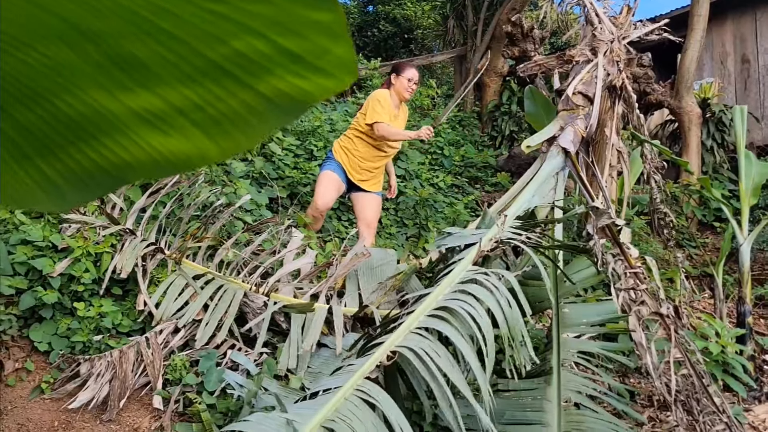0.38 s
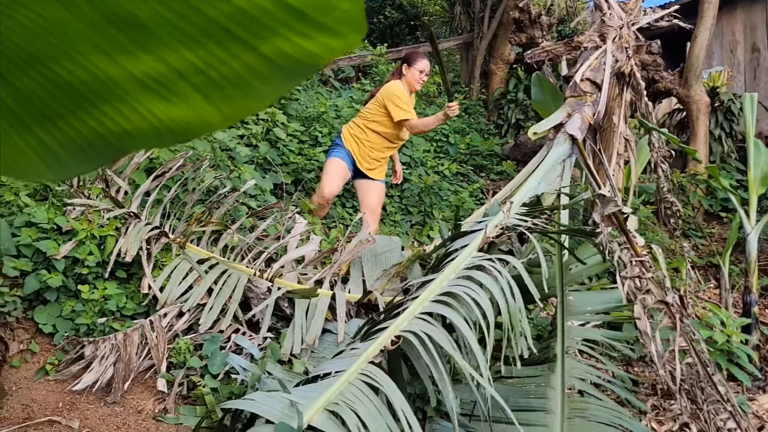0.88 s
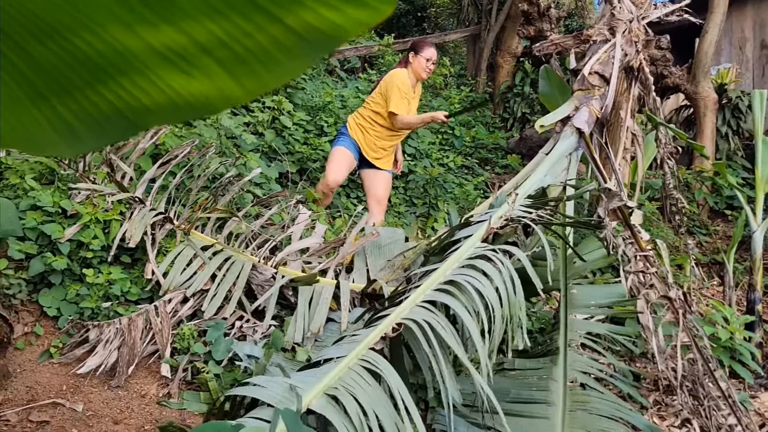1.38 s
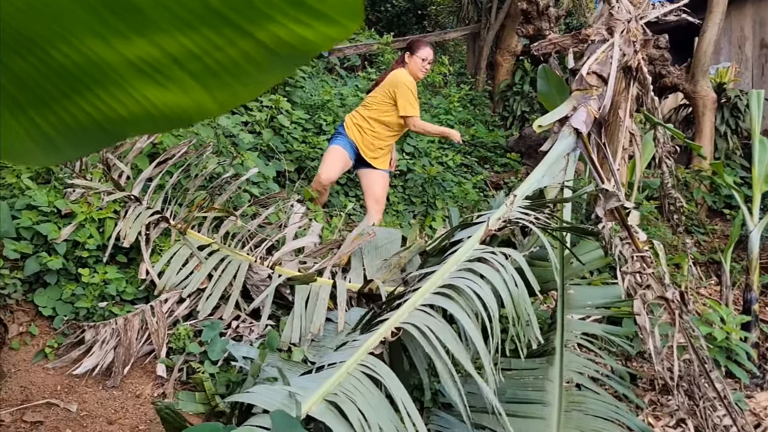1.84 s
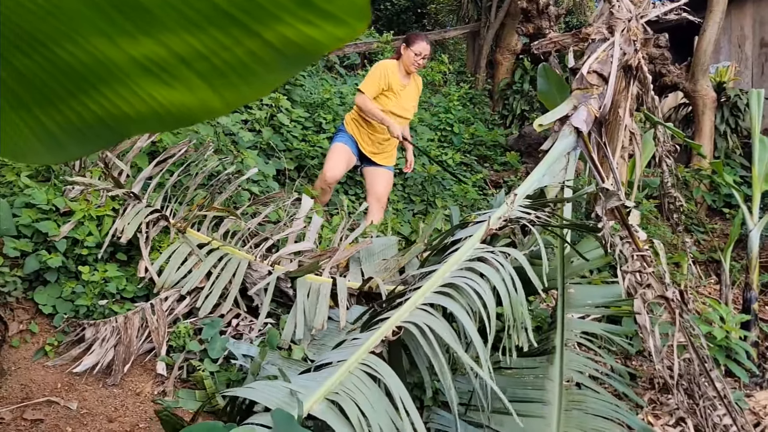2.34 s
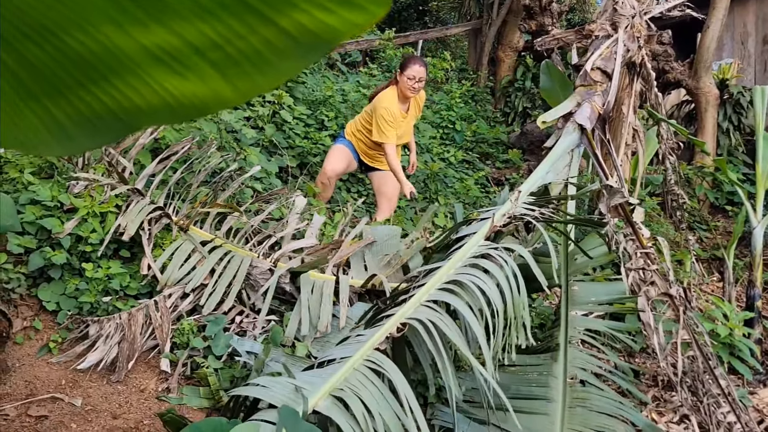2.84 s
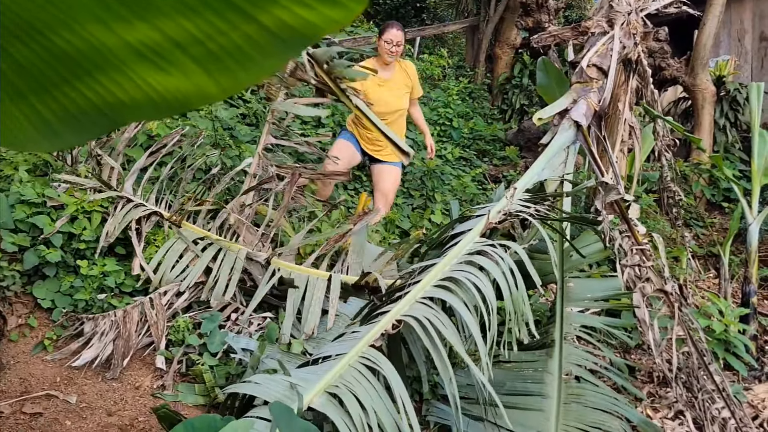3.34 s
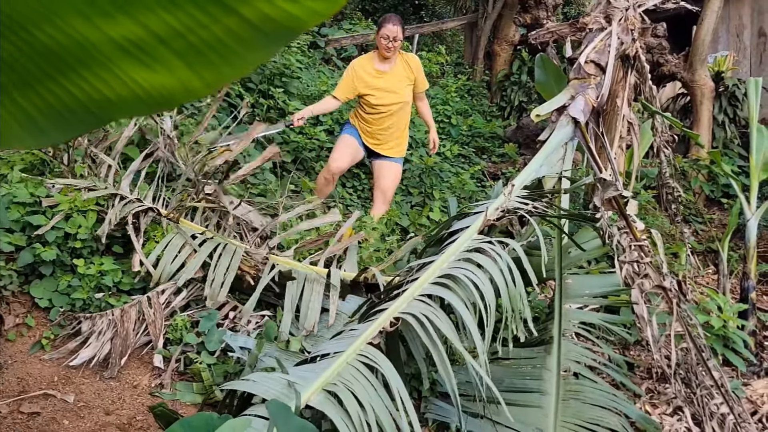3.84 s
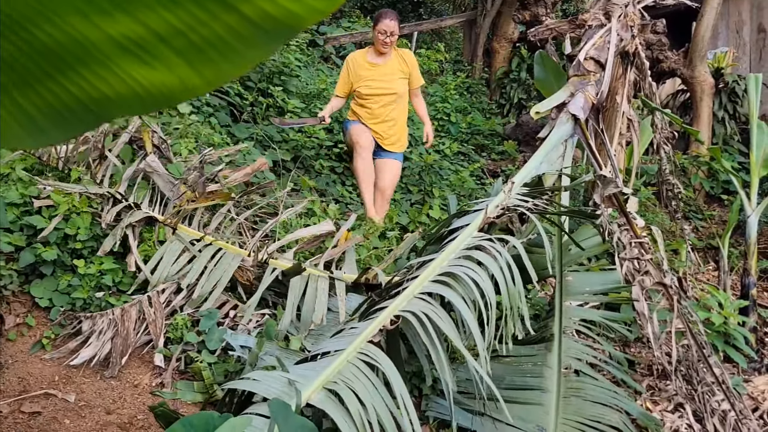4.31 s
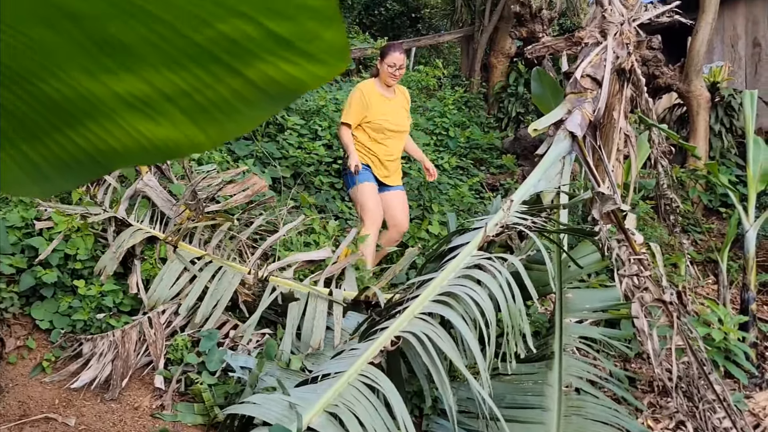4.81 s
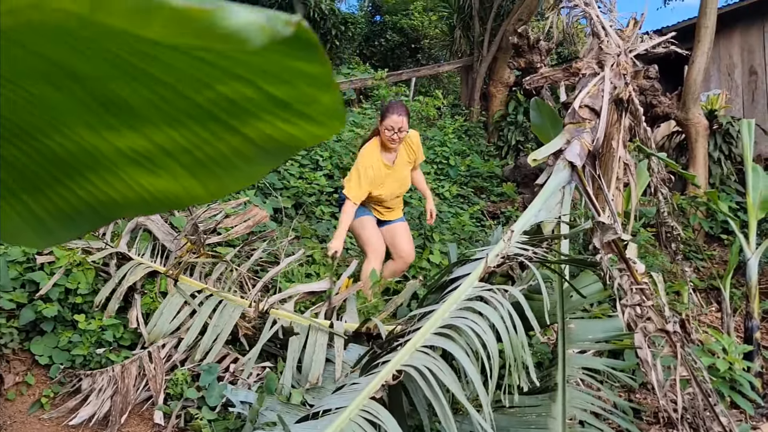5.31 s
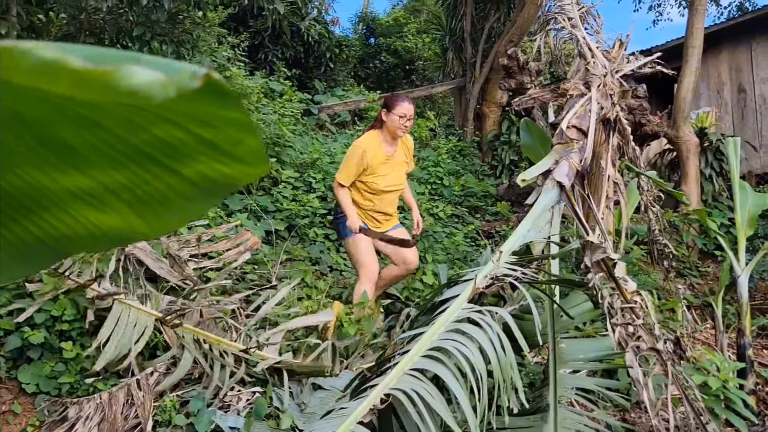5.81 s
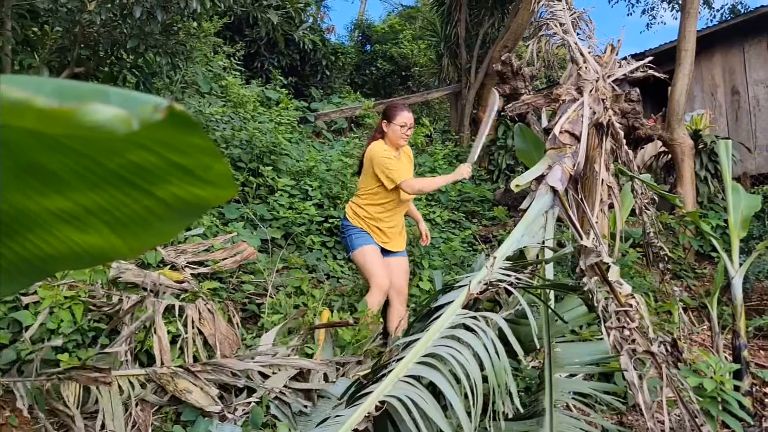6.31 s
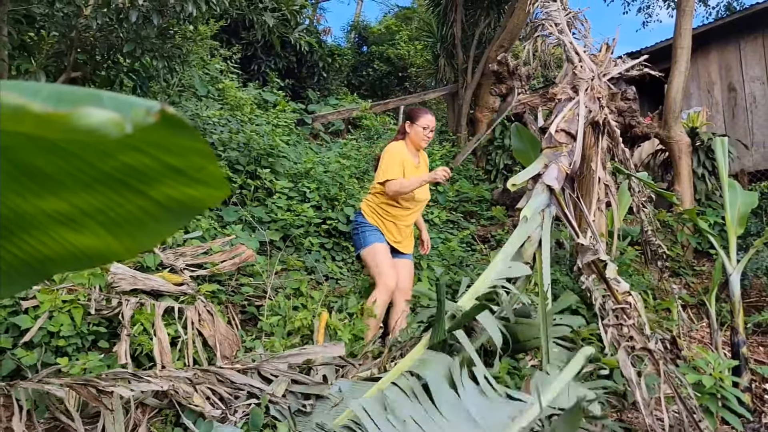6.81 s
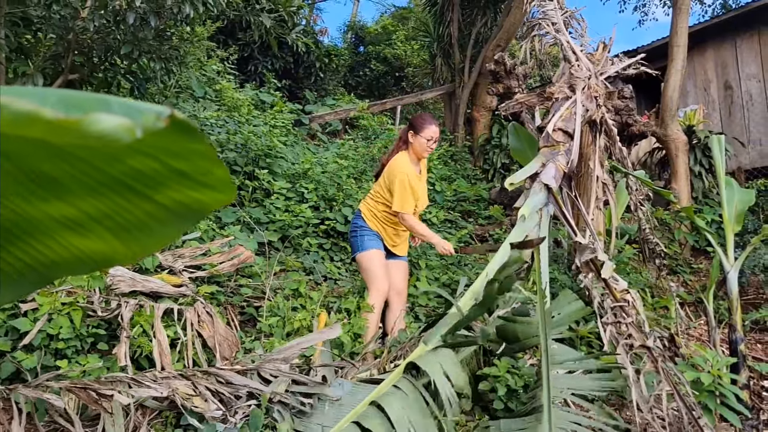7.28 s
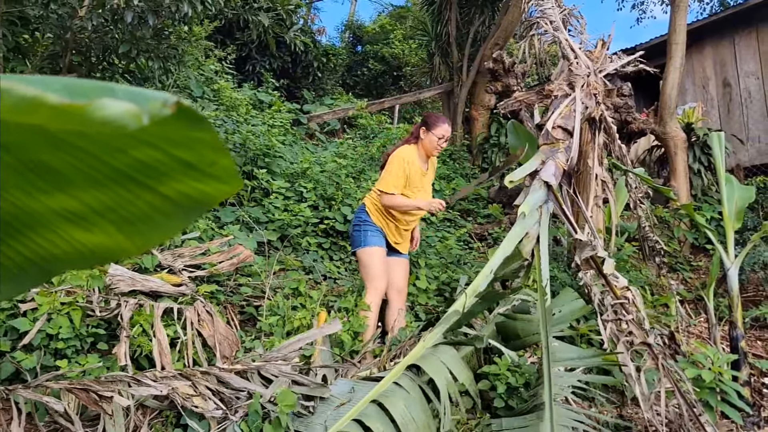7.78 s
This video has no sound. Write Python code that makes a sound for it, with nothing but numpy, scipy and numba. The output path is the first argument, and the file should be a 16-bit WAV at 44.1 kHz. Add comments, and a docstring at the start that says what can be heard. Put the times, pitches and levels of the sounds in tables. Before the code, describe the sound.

A quiet open garden with a low breeze hum, thin steady high insect singing and short dry reflections. At once, about 0.03 s, a blade slices a juicy stalk with a slightly ringing, drawn-out crunch; leaves shudder and crackle until 1.2 s. Thuddier chops land at 1.1 and 1.8 s, with small ticks and rustle. Near 2.5 to 3 s it is quieter, with faint bird whistles sliding down. From 2.9 s big dry leaves swell into a drag and crunch, with bright snaps at 3.3 to 3.5 s, then fading rustles and isolated twig clicks to 5.3 s. At 5.43 s comes the loudest blow, a hard, sharp crack with a short rustling tail. Crisper cuts follow at 6.5 and 7.3 s, with a strong leaf swish and crunches around 6.6 to 7 s, ending on small snaps and settling leaves.

```python
"""Quiet garden: a long blade chops a juicy plant stalk while big dry leaves are dragged and trodden.
Each cut is a burst of snapping fibres that rings the stalk and the steel; rustle is a swarm of tiny crackles,
each from its own direction; ribs and twigs snap with a short ring and splinters. Insects sing in two bands,
birds whistle a few falling notes, filtered noise makes the breeze and hum underneath."""
import sys
import numpy as np
from scipy import signal
from scipy.fft import rfft, irfft
from scipy.io import wavfile
from scipy.ndimage import uniform_filter1d
from numba import njit

SR = 44100
rng = np.random.default_rng(int(sys.argv[2]) if len(sys.argv) > 2 else 0)


def persist_wave(psi):
    """Save psi, clipped to +-1, as 16-bit WAV."""
    counts = np.round(np.clip(psi, -1, 1) * 32767).astype(np.int16)
    wavfile.write(sys.argv[1], SR, np.atleast_2d(counts).T)


def gain_from_db(level_db):
    """Convert decibel levels to linear amplitude factors (20 dB per decade)."""
    decades = np.asarray(level_db, float) / 20
    return 10 ** decades


N = 348522


def colour(table, hz):
    """dB of a (Hz, dB) table, straight on a log frequency axis."""
    table_hz, table_db = np.transpose(table)
    return np.interp(np.log(hz), np.log(table_hz), table_db)


def walk(rate_hz):
    """Random levels held 1 / rate_hz and slewed twice; spread near 1."""
    hold = int(SR / rate_hz)
    steps = np.repeat(rng.standard_normal(N // hold + 1), hold)
    return 0.77 * uniform_filter1d(uniform_filter1d(steps, hold), hold)[:N]


@njit
def ring(start, hz, tau, rise, size):
    """Damped sines, one per grain, begun at fractional samples with a soft edge, cut after six time constants."""
    out = np.zeros(N)
    for k in range(len(start)):
        s = 2j * np.pi * hz[k] / SR - 1 / (tau[k] * SR)
        first = int(np.ceil(start[k]))
        z = size[k] * np.exp(s * (first - start[k]))
        turn = np.exp(s)
        held = np.exp((start[k] - first) / (rise[k] * SR))
        release = np.exp(-1 / (rise[k] * SR))
        for i in range(max(first, 0), min(first + int(6 * tau[k] * SR) + 2, N)):
            out[i] += z.imag * (1 - held)
            z *= turn
            held *= release
    return out


# side the action is on: time_s, left_lag_us (positive: the left port hears it later)
ACTION_SIDE = [(0, 88), (2.4, 90), (2.8, -61), (4, -120), (5.4, -42), (6.1, -150), (6.45, 76), (7.9, 95.5)]


def ports(start_s, hz, tau_s, rise_s, size, scatter_us):
    """The same grains at two microphone ports; each grain's direction sets its lag."""
    lag_s = (np.interp(start_s, *np.transpose(ACTION_SIDE)) + scatter_us) / 1e6
    return np.array([ring((start_s + side * lag_s / 2) * SR, hz, tau_s, rise_s, size) for side in (1, -1)])


# pitch limits of the grains: lowest_hz, highest_hz
GRAIN_RANGE = (50, 16000)


def grain_hz(share):
    """Pitch of a grain; small high ones are far more numerous."""
    lowest_hz, highest_hz = GRAIN_RANGE
    return lowest_hz * (highest_hz / lowest_hz) ** np.sqrt(share)


# centres of the three level regions: thud_hz, body_hz, edge_hz
REGION_CENTRES = (160, 1400, 10500)


def crackles(start_s, levels_db, shape, chance, per_second, cycles, uneven_db, spread_us):
    """Grain sizes give each region its power per octave, with a few much larger than the rest."""
    pitch_chance, size_chance, sign_chance, side_chance, _ = chance
    hz = grain_hz(pitch_chance)
    octaves = np.log2(GRAIN_RANGE[1] / GRAIN_RANGE[0])
    per_octave = per_second * 2 * np.sqrt(pitch_chance) / octaves
    place = np.interp(np.log(hz), np.log(REGION_CENTRES), np.arange(3))
    level_db = sum(np.maximum(1 - abs(place - k), 0) * levels_db[k] for k in range(3))
    level_db = level_db + colour(shape, hz)
    tau_s = cycles / hz + 0.000088  # even the smallest flake rattles a moment
    luck = gain_from_db(-uneven_db * np.log(0.02 + size_chance)) * np.sign(sign_chance - 0.5)
    luck = luck / np.sqrt(np.mean(luck ** 2))
    # crowded or long-ringing grains are made smaller
    size = gain_from_db(level_db) * luck * np.sqrt(12 / (per_octave * tau_s))
    return ports(start_s, hz, tau_s, tau_s, size, spread_us * (2 * side_chance - 1))


# blows: start_s, body_db, thud_db (over body), sink_ms, cut_ms, stalk_hz (pitch favoured by the spot struck),
# blade_db (over body, before a common trim), blade_hz (pitch favoured)
BLOWS = [(0.03, -31, 1.5, 1.02, 20.4, 780, -4, 2000), (1.133, -22.5, 6, 1.06, 2, 970, -30, 11600),
         (1.831, -26, 10, 0.79, 6.4, 460, -22, 7300), (5.433, -18.5, -18, 4.74, 5.8, 200, -18, 3500),
         (6.505, -23, -19, 4, 2.8, 1150, -19, 4250), (7.311, -30, -13, 1.325, 8.9, 1340, -15, 2660)]
# relative spectrum of parting fibres: pitch_hz, level_db (per octave)
FIBRE_COLOUR = [(50, -44), (160, -31.5), (400, -3), (1400, -2.5), (3000, 4.5), (5000, 4.5), (8000, 7),
                (11000, 3.5), (16000, 11)]
# stalk modes: pitch_hz, level_db, t60_s
STALK_MODES = [(158, -9, 0.1), (363.4, -5.5, 0.098), (520, -5, 0.039), (780, -9.5, 0.034), (890, -5, 0.035),
               (1130, -2.5, 0.033), (1396, -2.5, 0.029)]
# blade modes: pitch_hz, level_db, t60_s
BLADE_MODES = [(786, -8, 0.63), (1560, -10, 0.49), (2660, -1, 0.14), (4250, 1.5, 0.19), (4890, 0, 0.27),
               (5420, 0, 0.3), (7300, 12, 0.15), (11600, -12, 0.085)]


def chops(count=2500, window_s=0.08):
    """The edge sinks in, fibres part all through the cut and die away; stalk and steel ring from the bite."""
    edge_db, blade_trim_db = -8, -4
    stalk_ring_db, softer_db_per_ms = 10.5, 2.5  # the slower the edge sinks in, the less the stalk rings
    out = 0
    for start_s, body_db, thud_db, sink_ms, cut_ms, stalk_hz, blade_db, blade_hz in BLOWS:
        chance = rng.random((count, 5)).T
        ms = 1000 * window_s * chance[4]
        sinking_db = -14 * np.maximum(1 - ms / sink_ms, 0)
        dying_db = -1.62 * np.maximum(ms - sink_ms - cut_ms, 0)
        levels_db = [body_db + over_db + (sinking_db + dying_db) for over_db in (thud_db, 0, edge_db)]
        out = out + crackles(start_s + ms / 1000, levels_db, FIBRE_COLOUR, chance, count / window_s,
                             cycles=0.78, uneven_db=4.0, spread_us=29)
        bite_s = start_s + sink_ms / 1000
        stalk_db = body_db + stalk_ring_db - softer_db_per_ms * sink_ms
        out = out - struck(STALK_MODES, bite_s, stalk_db, stalk_hz, fall_db=6)
        steel = np.repeat(BLADE_MODES, 3, axis=0)  # the flexing steel splits each mode
        out = out - struck(steel, bite_s, body_db + blade_db + blade_trim_db, blade_hz, fall_db=7)
    return out


def struck(modes, bite_s, level_db, near_hz, fall_db):
    """Modes of a struck body: the spot favours those near one pitch, losing fall_db per octave away."""
    hz, mode_db, t60_s = np.transpose(modes)
    size = gain_from_db(level_db + mode_db - fall_db * abs(np.log2(hz / near_hz)))
    hz = hz * (1 + 0.006 * rng.standard_normal(len(hz)))
    return ports(np.full(len(hz), bite_s), hz, t60_s / np.log(1000), 0.19 / hz, size, 0)


# big leaves dragged, lifted or trodden: start_s, swell_s, hold_s, body_db, edges_db (dry edges over body)
LEAF_MOVES = [(0.168, 0.23, 0.098, -48.5, -14), (0.59, 0.075, 0.54, -52.5, -6), (1.3, 0.13, 0.48, -69, -5),
              (1.838, 0.015, 0.2, -56.5, -5), (2.544, 0.23, .05, -70, -1), (2.837, 0.56, 0.13, -44.5, -5),
              (3.7, .14, 0.15, -47, 1), (4.082, 0.044, 0.12, -54, -2.5), (4.306, 0.083, 0.27, -65, 1),
              (4.865, 0.23, 0.17, -69, -2.5), (5.445, 0.025, 0.64, -54.5, -1), (6.048, 0.18, 0.069, -54, 4),
              (6.523, 0.28, 0.2, -42, -9.5), (6.99, 0.065, 0.11, -46.5, -3.5),
              (7.176, 0.063, 0.1, -48.5, -0.5), (7.5, .05, 0.44, -65.5, -8)]
# brief crunches and the shudder after a blow: start_s, length_s, body_db,
# stems_db (heavy stems over body), edges_db (dry edges over body)
LEAF_CRUNCHES = [(0.05, 0.021, -45.5, 0, -13), (0.091, 0.028, -48.5, -5, -4.5), (0.2, 0.013, -55.5, 1, 1.5),
                 (0.23, 0.047, -44, -11, -9.5), (0.359, 0.029, -50, -30.5, 1),
                 (0.415, 0.022, -47.5, -19, 0.5), (0.455, 0.011, -58, -16.5, -4),
                 (0.504, 0.05, -42, -29, -8.5), (1.11, 0.024, -49.5, -2, -6), (1.14, 0.052, -51, -1, -5),
                 (1.632, 0.0071, -55, 1.5, 10), (1.652, 0.0078, -60.5, 3, 11), (1.754, 0.016, -67, 4, 10.5),
                 (1.949, 0.006, -55.5, 12, 7), (2.875, .05, -51.5, -6, -7.5),
                 (3.205, 0.036, -46.5, -7, -0.5), (3.302, 0.016, -40, -15.5, -4),
                 (3.37, 0.033, -42, -16.5, -11), (3.495, 0.026, -43, -3, 0.5), (4.022, 0.02, -44, -3, 1.5),
                 (4.14, .02, -55, -5, -2), (4.585, 0.013, -50.5, -31, -4.5),
                 (4.755, 0.024, -55, -25.5, -11.5), (5.15, 0.012, -61, -12, -5),
                 (5.192, 0.036, -55, -4, 0.5), (5.275, 0.011, -58.5, 2, -17), (5.439, 0.035, -36, -1, 3),
                 (6.549, 0.014, -40.5, 0.5, -4), (6.865, 0.045, -37.5, -5.5, -5.5),
                 (6.935, 0.023, -48, 9, 5), (7.32, 0.014, -48, 11.5, -2), (7.361, 0.061, -49, 0, 2)]
# leaves never quite rest: stems_db, body_db, edges_db
RESTLESS_LEVELS = (-78, -82, -82)


def motion(s):
    """Stem, body and edge dB at times s: every move and crunch swells, holds and fades; their powers add."""
    move_stems_db, move_fade_db_per_s, swell_power = -8.5, 62, 0.75
    crunch_swell, crunch_hold, crunch_fade_db = 0.16, 0.35, 6  # shares of the length; dB per length
    rows = [(start_s, swell_s, hold_s, body_db, move_stems_db, edges_db, move_fade_db_per_s)
            for start_s, swell_s, hold_s, body_db, edges_db in LEAF_MOVES]
    rows += [(start_s, crunch_swell * length_s, crunch_hold * length_s, *levels_db, crunch_fade_db / length_s)
             for start_s, length_s, *levels_db in LEAF_CRUNCHES]
    power = np.outer(gain_from_db(RESTLESS_LEVELS) ** 2, np.ones(len(s)))
    for start_s, swell_s, hold_s, body_db, stems_db, edges_db, fade_db_per_s in rows:
        swell = np.clip((s - start_s) / swell_s, 0, 1) ** swell_power
        faded_db = fade_db_per_s * np.maximum(s - start_s - swell_s - hold_s, 0)
        gain = swell * gain_from_db(body_db - faded_db)
        power = power + np.outer(gain_from_db(np.array([stems_db, 0, edges_db])), gain) ** 2
    return 10 * np.log10(power)


# relative spectrum of the rustle: pitch_hz, level_db (per octave)
LEAF_COLOUR = [(50, -22.5), (160, -7), (400, -4.5), (1400, 0.5), (3000, 4), (5000, 4.5), (8000, 2.5),
               (11000, 0), (16000, 6)]
# grains: rate_per_s, share_db, ring_cycles (time constant, in periods), uneven_db
LEAF_GRAINS = [(13170, -1, 1.34, 0), (900, -9, 3.9, 2.5), (250, -12, 3.5, 3.5)]


def leaves(patches=14):
    """Fine hiss and fewer, larger cracks follow the motion, clump in time; each leaf size flares on its own."""
    flares = np.array([walk(40) for _ in range(patches)])
    clumps_db = 0.8 * walk(33) + 1.44 * walk(110)
    out = 0
    for per_second, share_db, cycles, uneven_db in LEAF_GRAINS:
        chance = rng.random((int(per_second * N / SR), 5)).T
        start_s = chance[4] * N / SR
        at = (start_s * SR).astype(int)
        patch = (np.sqrt(chance[0]) * patches).astype(int)
        levels_db = motion(start_s) + share_db + clumps_db[at] + 2.0 * flares[patch, at]
        out = out + crackles(start_s, levels_db, LEAF_COLOUR, chance, per_second, cycles, uneven_db, spread_us=173)
    return out


# single snaps and knocks: start_s, level_db, pitch_hz, ring_cycles (time constant, in periods)
SINGLE_SNAPS = [(0.676, -37, 1160, 5.3), (0.779, -30, 3000, 2.8), (0.991, -28.5, 1420, 2.8),
                (1.635, -32, 4700, 1.1), (1.951, -35, 5100, 1), (2.751, -57.5, 510, 4.3),
                (2.752, -57, 1090, 6.4), (2.88, -45, 157, 3.2), (3.09, -34, 1130, 3.7),
                (3.303, -22, 2620, 2.8), (3.313, -26, 3100, 2.5), (3.435, -22, 4950, 2.2),
                (3.5, -40.5, 149, 2.9), (3.99, -45, 126.1, 1.9), (4.228, -46, 556, 6.3),
                (4.527, -26, 3500, 0.86), (4.856, -60, 1130, 28), (5.015, -39.5, 2580, 2.5),
                (5.097, -39, 2900, 2.2), (5.137, -36, 13000, 1.9), (5.219, -20, 9050, .8),
                (5.287, -37.5, 1130, 1.4), (5.438, -10, 3000, 1.7), (5.438, -18, 150, 1.06),
                (5.4405, -20, 520, 1.9), (5.663, -40, 1255, 6), (5.735, -27, 3065, 1.2),
                (6.126, -34, 1670, 3.4), (6.27, -28.5, 4020, 6.4), (6.402, -35, 2660, 1.7),
                (6.888, -23, 2270, 1.1), (7.327, -46, 130, 0.69), (7.603, -40.5, 3230, 4.5),
                (7.643, -34, 4000, 1.5), (7.743, -50, 1750, 4.3), (7.821, -44, 900, 2.8)]


def snaps(count=24):
    """A rib, twig or stem gives way: one ring at its pitch, then splinters round it, tighter the longer it rings."""
    ticks, tick_db, tick_hz = 30, -49, 9000  # faint dry ticks at random moments, spread round these values
    when, loud, tune = rng.random((ticks, 3)).T
    faint = zip(when * N / SR, tick_db + 10 * (loud - 0.5), tick_hz * 2 ** (2 * tune - 1.3), np.ones(ticks))
    splinter = np.arange(count) > 0
    out = []
    for start_s, level_db, hz, cycles in [*SINGLE_SNAPS, *faint]:
        late, wide = rng.exponential(size=count), rng.standard_normal(count)
        scatter_us = np.full(count, 60 * rng.standard_normal())
        pitch_hz = np.clip(hz * 2 ** (1.64 * wide * splinter / cycles), 0.824 * hz, GRAIN_RANGE[1])
        size = gain_from_db(level_db - splinter * (18.0 + 2.5 * late))
        begin_s = start_s + 0.003 * late ** 2 * splinter
        out.append((begin_s, pitch_hz, cycles / pitch_hz, 0.3 / pitch_hz, size, scatter_us))
    return ports(*np.concatenate(out, axis=1))


def foliage(x):
    """Leaves, ground and a plank wall scatter the near sounds into a short haze, different at each port."""
    t60_s, level_db = 0.14, -10
    t = np.arange(SR // 4) / SR
    haze = rng.standard_normal((2, len(t))) * gain_from_db(-60 * t / t60_s) * np.minimum(t / 0.0027, 1)
    both = haze.mean(axis=0)  # long waves reach both ports alike
    haze = both + signal.sosfilt(signal.butter(1, 600, "high", fs=SR, output="sos"), haze - both)
    # long waves bend round the leaves, the shortest are soaked up
    haze = signal.sosfilt(signal.butter(1, (250, 14000), "band", fs=SR, output="sos"), haze)
    haze = haze / np.sqrt(np.sum(haze ** 2) / 2)
    return gain_from_db(level_db) * signal.fftconvolve(x, haze, axes=1)[:, :N]


# bird notes: start_s, length_s, from_hz, to_hz (before the final droop), level_db
BIRD_NOTES = [(2.465, .09, 4750, 4620, -68), (2.545, .05, 2250, 1600, -70), (2.61, .165, 4740, 4460, -65),
              (2.81, .17, 4680, 4450, -65), (2.69, .06, 2500, 2350, -71)]


def bird():
    """Thin wavering whistles that grow, slide down and droop at the end."""
    out = np.zeros(N)
    for start_s, length_s, from_hz, to_hz, level_db in BIRD_NOTES:
        part = np.clip((np.arange(N) / SR - start_s) / length_s, 0, 1)
        hz = from_hz + (to_hz - from_hz) * (part + 0.2 * part ** 8) + 15 * walk(90)
        swell = np.sqrt(2 * np.sin(np.pi * part ** 2))
        out += gain_from_db(level_db + 1.5 * walk(60)) * swell * np.sin(2 * np.pi * np.cumsum(hz) / SR)
    return out * np.array([[1], [0.8]])


# insect kinds: pitch_hz, spread_hz, ring_s (time constant), level_db (rms)
INSECT_KINDS = [(6182, 112, 0.0029, -62), (2580, 34, 0.0032, -73.5)]


def insects(count=9000):
    """Many far wing strokes, each ringing briefly near its kind's pitch, with widely scattered directions."""
    out = 0
    for hz, spread_hz, ring_s, level_db in INSECT_KINDS:
        start_s = rng.random(count) * N / SR
        tune, lag = rng.standard_normal((count, 2)).T
        tau_s = np.full(count, ring_s)
        chorus = ports(start_s, hz + spread_hz * tune, tau_s, tau_s, np.ones(count), 150 * lag)
        chorus = chorus * gain_from_db(0.8 * walk(3.14))
        out = out + gain_from_db(level_db) * chorus / np.sqrt(np.mean(chorus ** 2))
    return out


# relative spectrum of the open air: pitch_hz, level_db (per Hz)
AIR_COLOUR = [(25, 2), (60, -1), (230, -10), (500, -2.5), (750, -14), (2000, -15), (4500, -13),
              (7500, -12.5), (9000, -38), (12000, -25), (16000, -23)]


def air(level_db=-64.5):
    """Far breeze and hum as shaped noise: alike at both ports in the bass, unrelated in the treble."""
    hz = np.maximum(np.fft.rfftfreq(N, 1 / SR), 1)
    mid, side = rfft(rng.standard_normal((2, N))) * gain_from_db(colour(AIR_COLOUR, hz))
    wide = np.minimum(hz / 2500, 1)
    spectra = np.array([mid + wide * side, mid - wide * side]) / np.sqrt(1 + wide ** 2)
    hum = irfft(spectra, N) * gain_from_db(1.2 * walk(3.7) + 1.5 * walk(15))
    return gain_from_db(level_db) * hum / np.sqrt(np.mean(hum ** 2))


def scene():
    """Blows, leaves and snaps over the quiet garden."""
    near = chops() + leaves() + snaps()
    return near + foliage(near) + insects() + bird() + air()


def top_cut(x):
    """Nothing passes above the cut-off."""
    return signal.sosfilt(signal.butter(12, 16810, fs=SR, output="sos"), x)


def record(dry):
    """Two unequal ports that lose the deepest bass and the very top."""
    right_db, shade_hz, top_hz = 3, 7500, 15850  # the right port is more sensitive below the shading corner
    below = signal.sosfilt(signal.butter(1, shade_hz, fs=SR, output="sos"), dry)
    mix = dry + below * (gain_from_db([[-right_db / 2], [right_db / 2]]) - 1)
    mix = signal.sosfilt(signal.butter(2, 70, "high", fs=SR, output="sos"), mix)
    mix = signal.sosfilt(signal.ellip(6, 0.3, 25, top_hz, fs=SR, output="sos"), mix)
    return top_cut(mix)


dry = scene()
out = record(dry)
persist_wave(out)
```